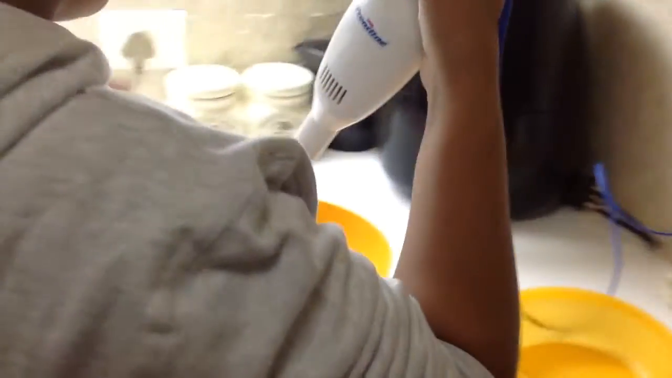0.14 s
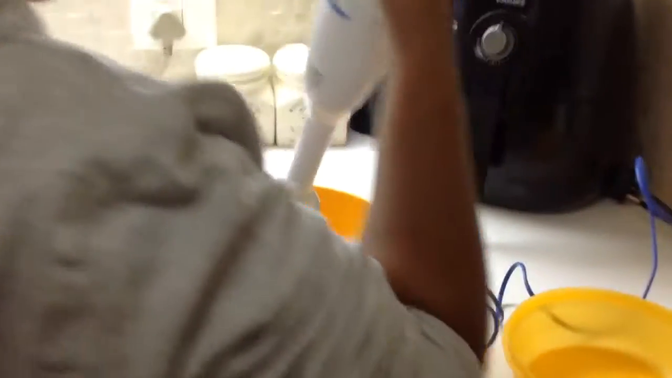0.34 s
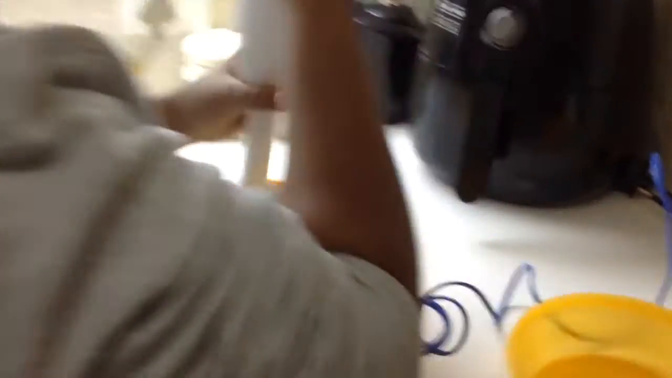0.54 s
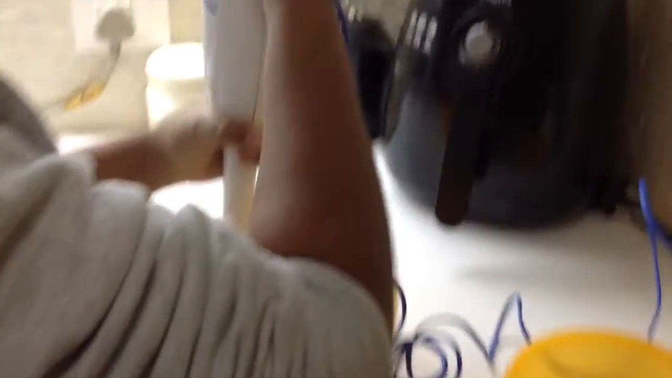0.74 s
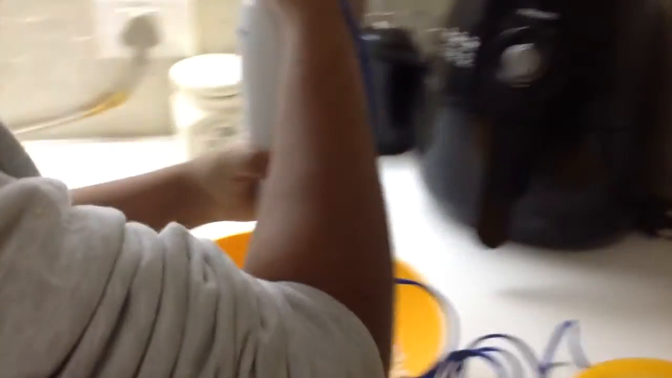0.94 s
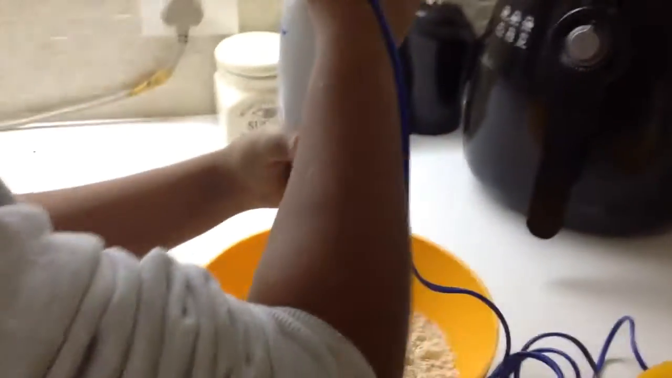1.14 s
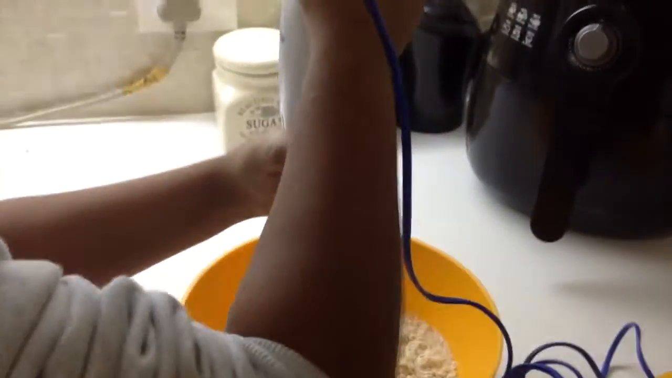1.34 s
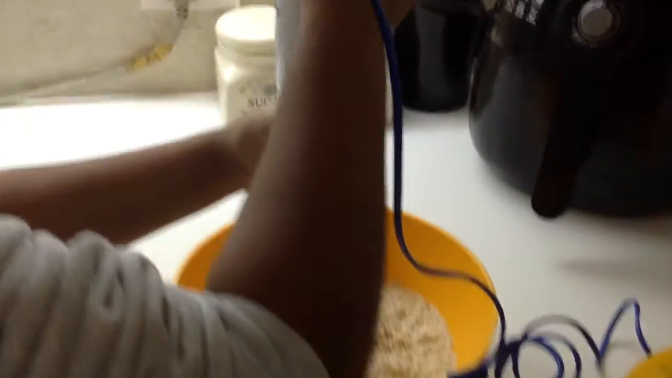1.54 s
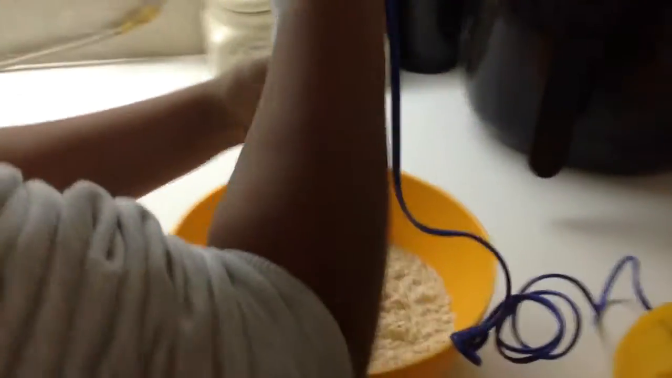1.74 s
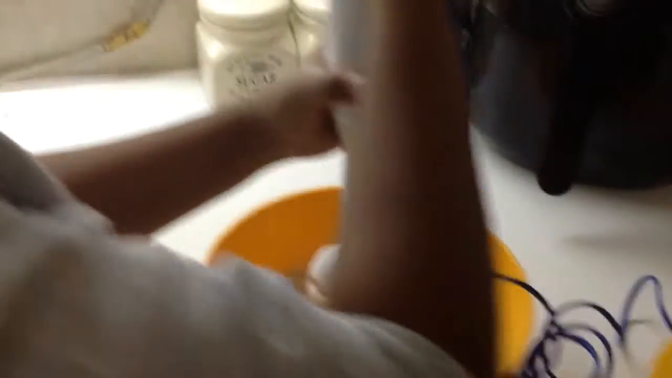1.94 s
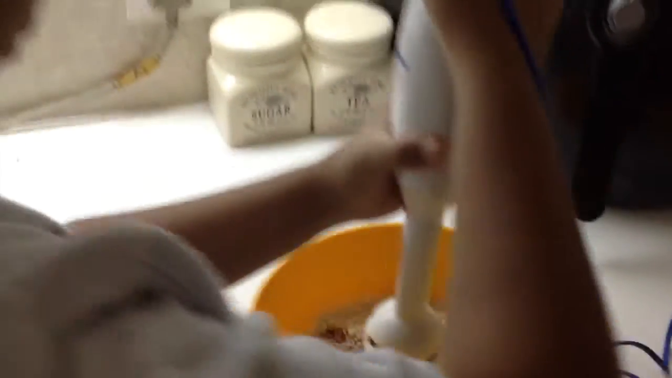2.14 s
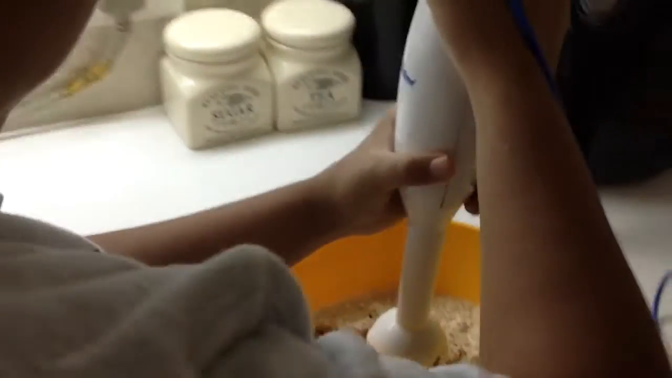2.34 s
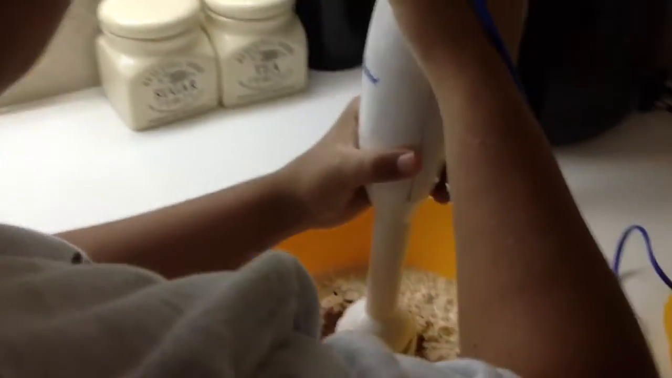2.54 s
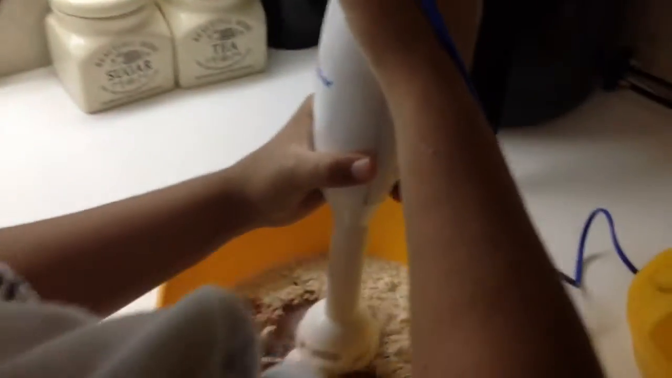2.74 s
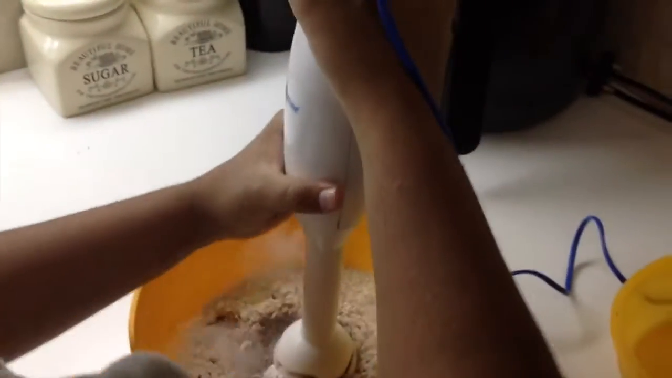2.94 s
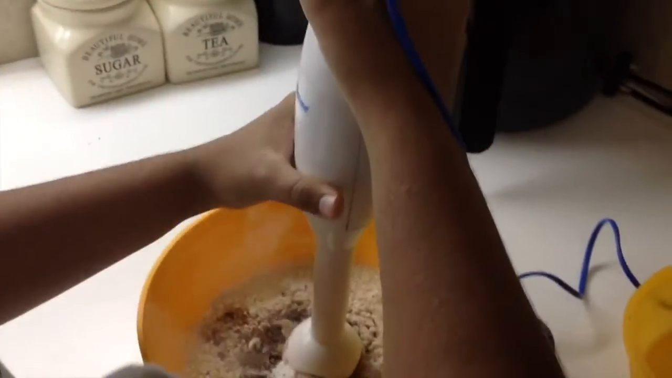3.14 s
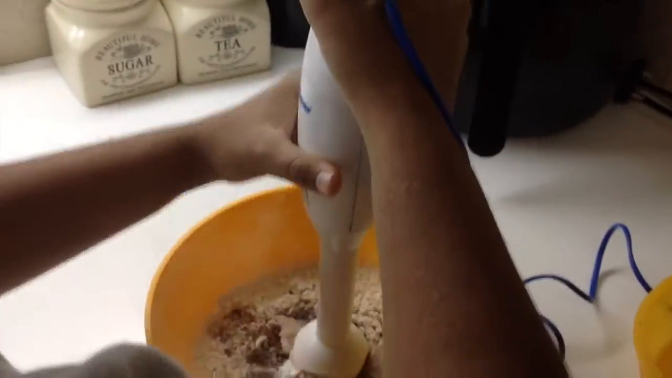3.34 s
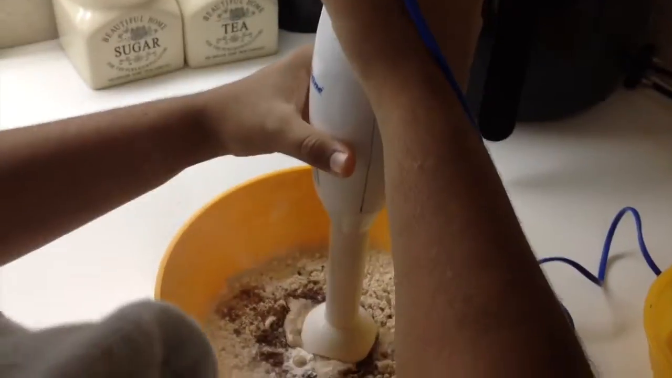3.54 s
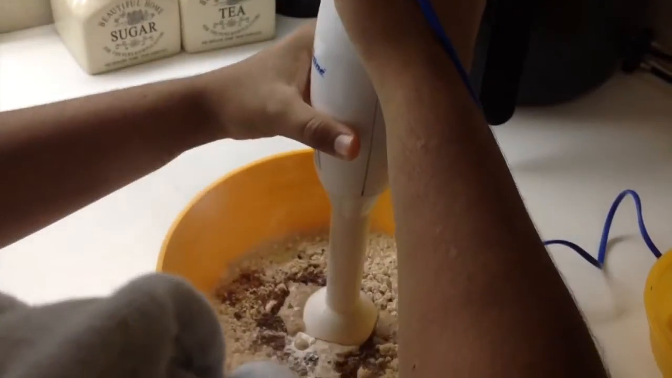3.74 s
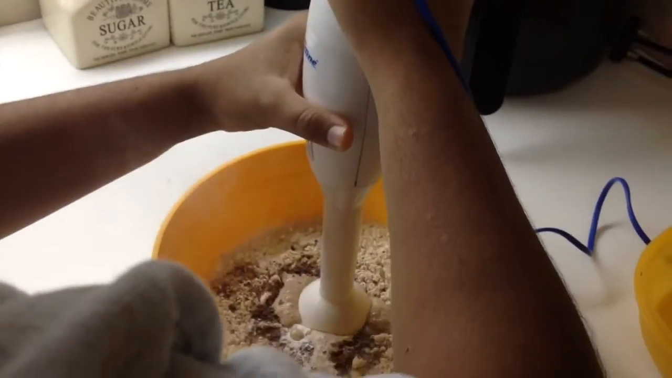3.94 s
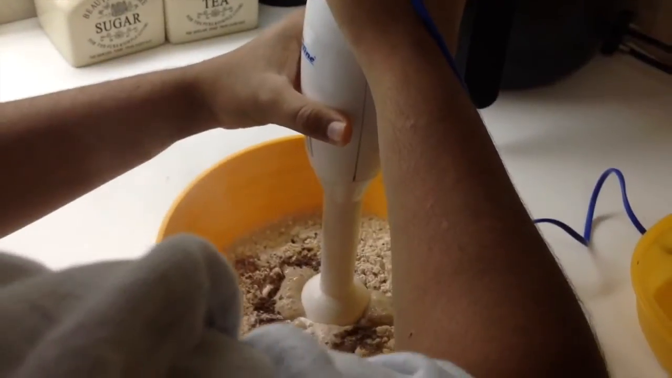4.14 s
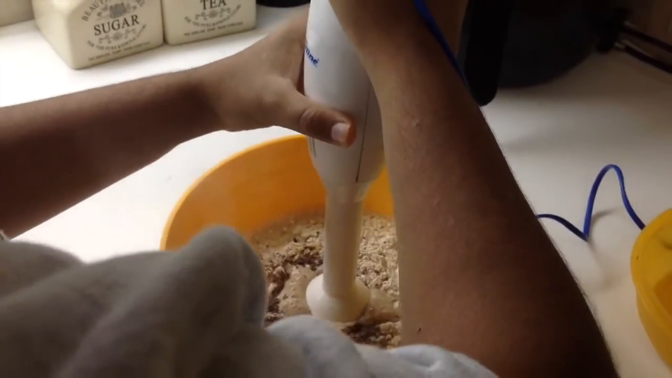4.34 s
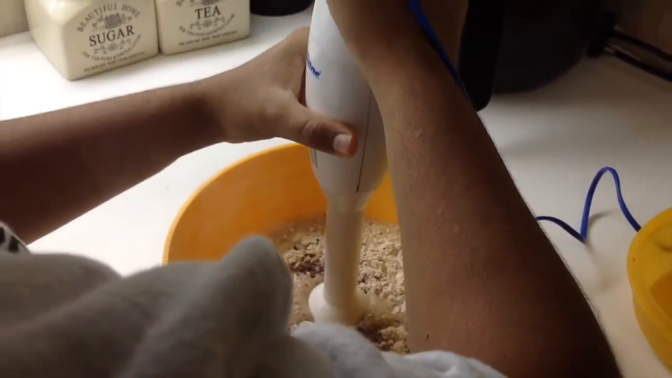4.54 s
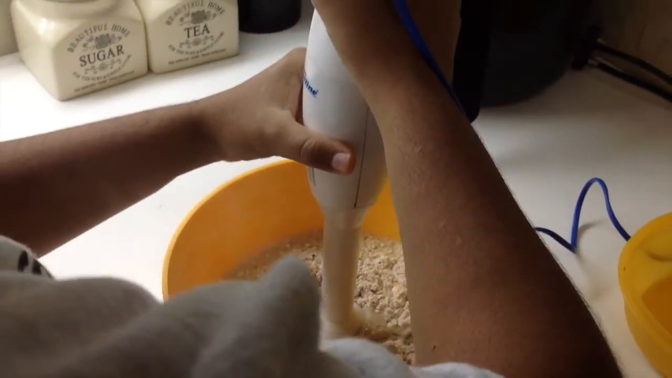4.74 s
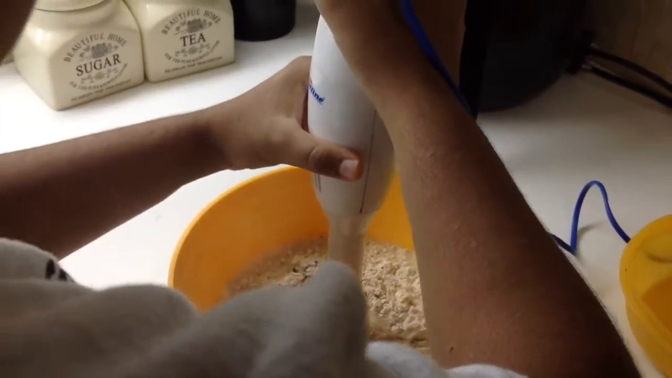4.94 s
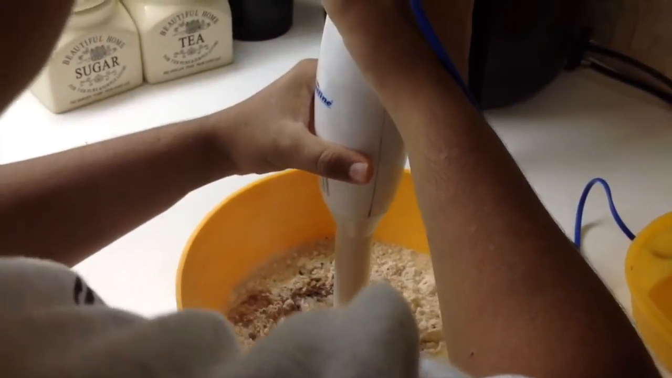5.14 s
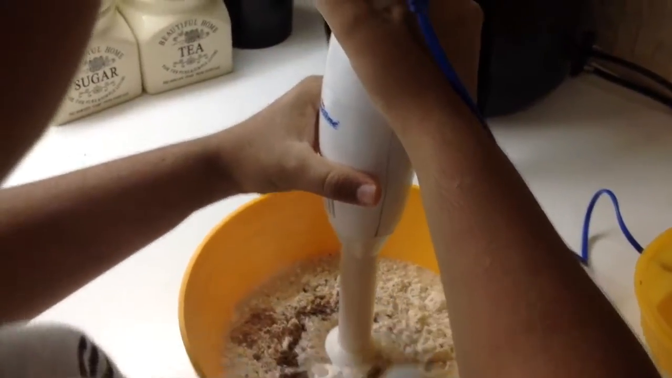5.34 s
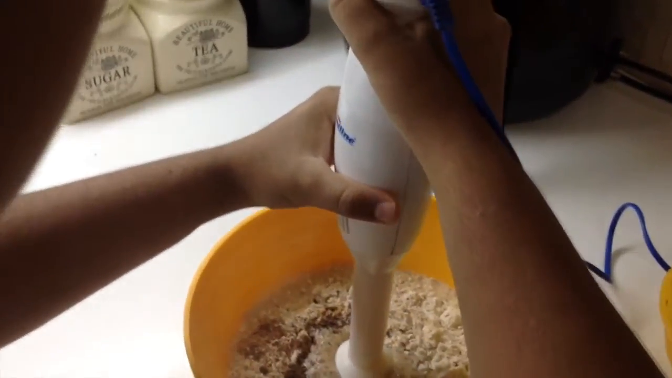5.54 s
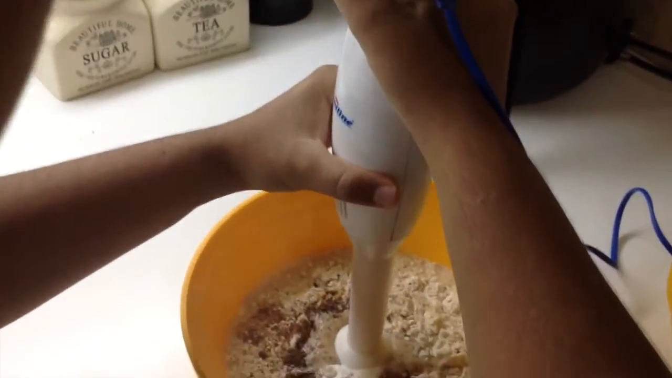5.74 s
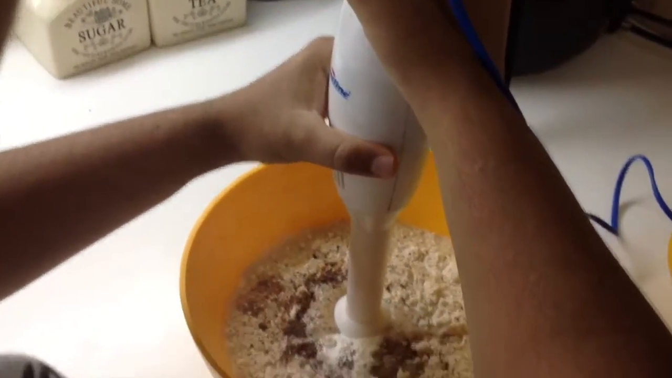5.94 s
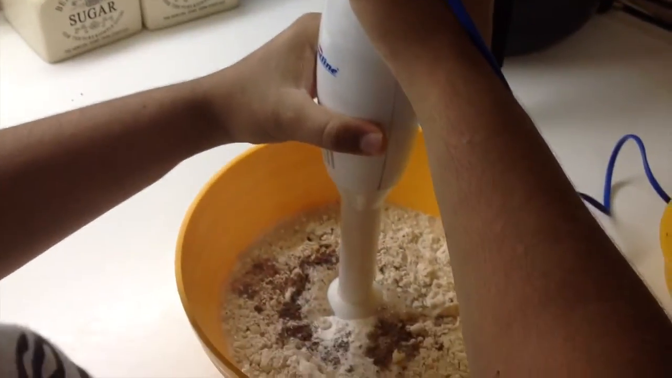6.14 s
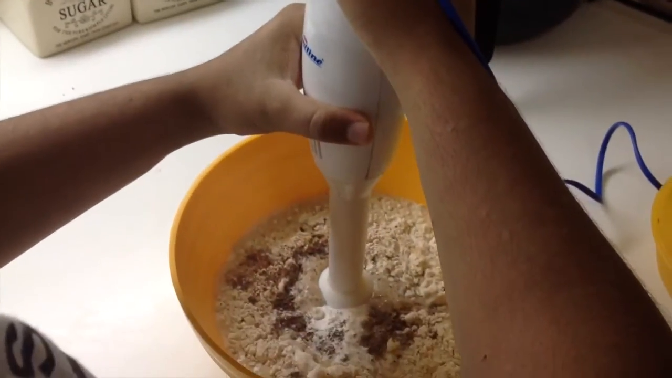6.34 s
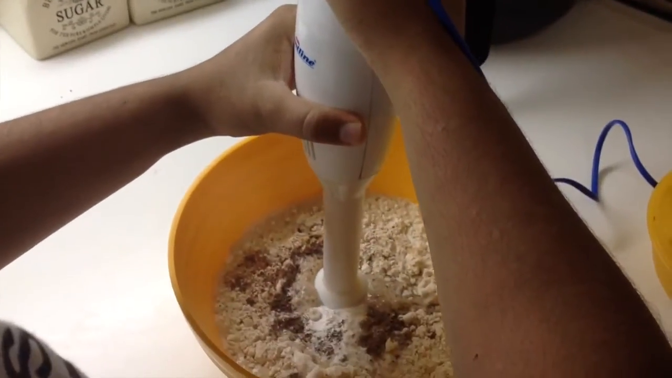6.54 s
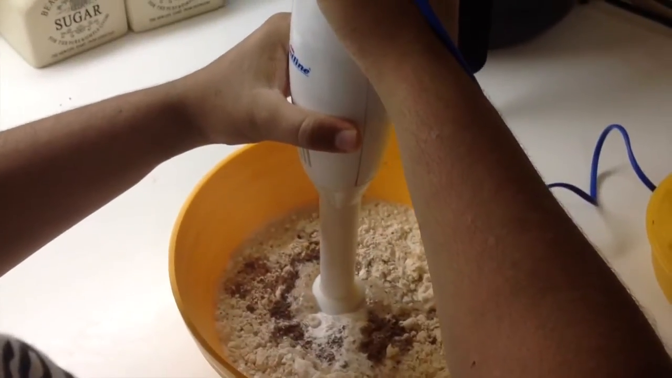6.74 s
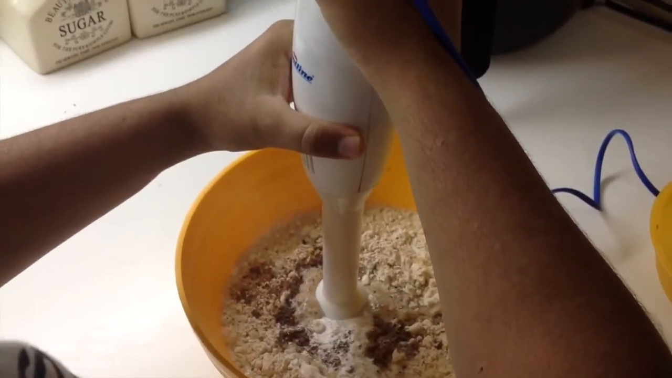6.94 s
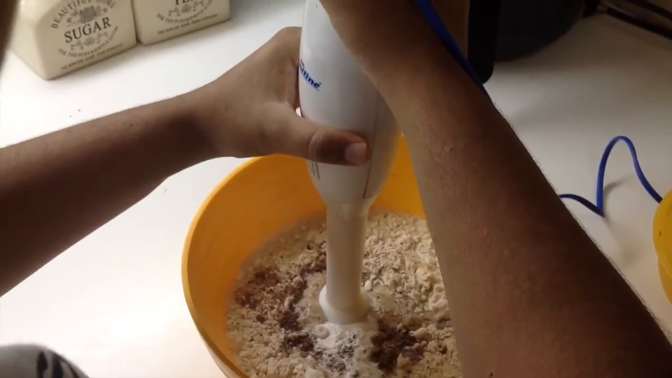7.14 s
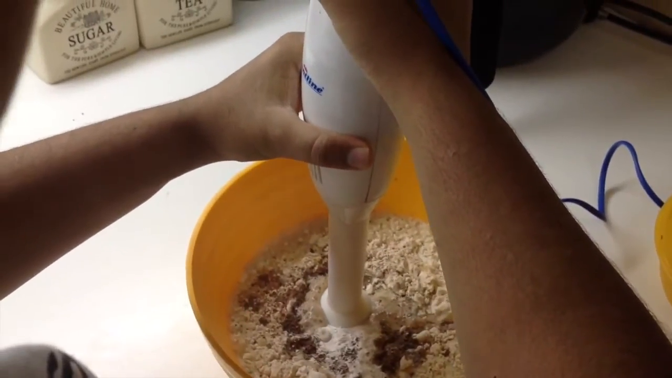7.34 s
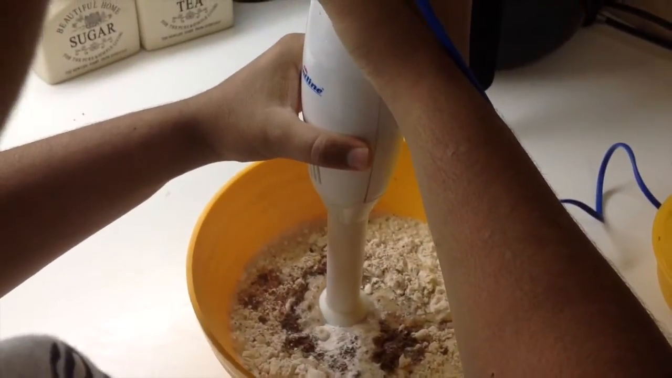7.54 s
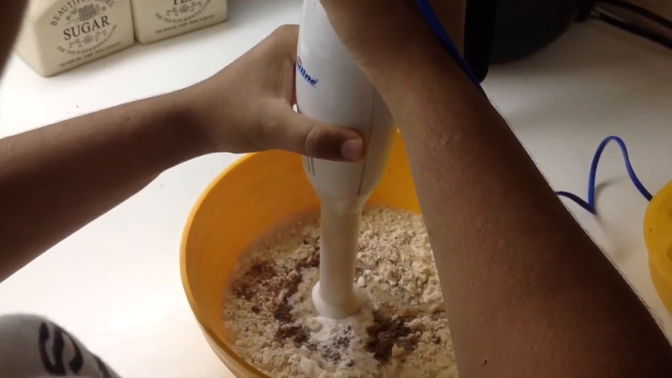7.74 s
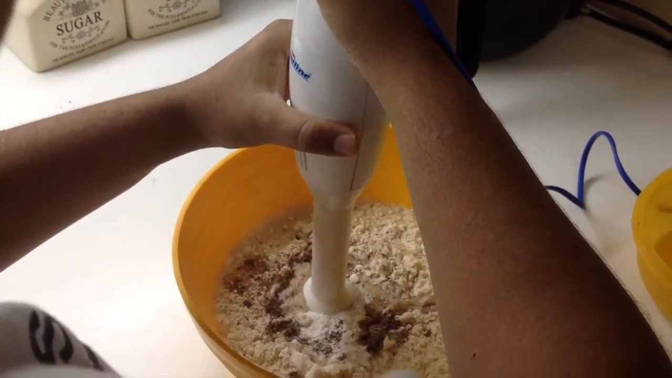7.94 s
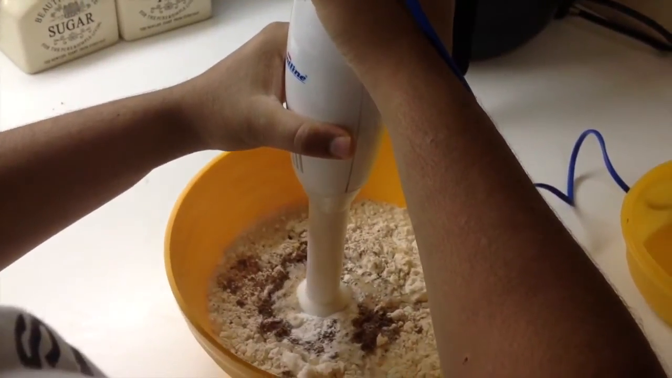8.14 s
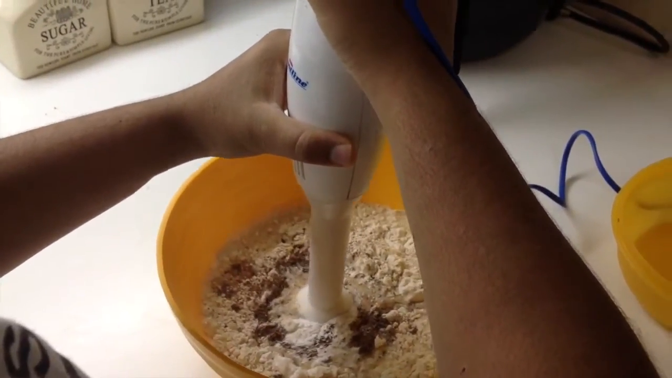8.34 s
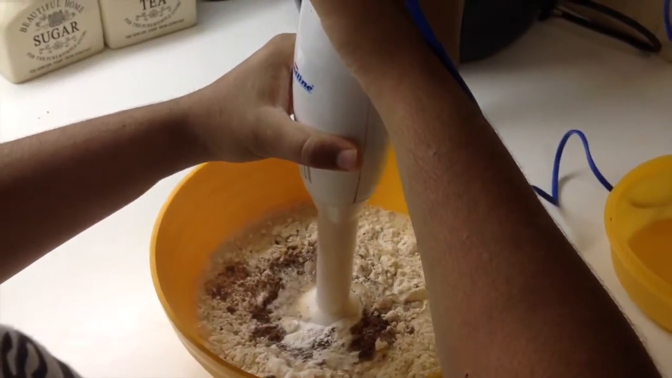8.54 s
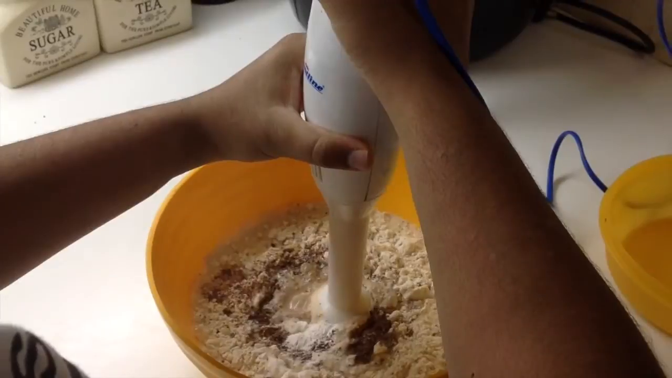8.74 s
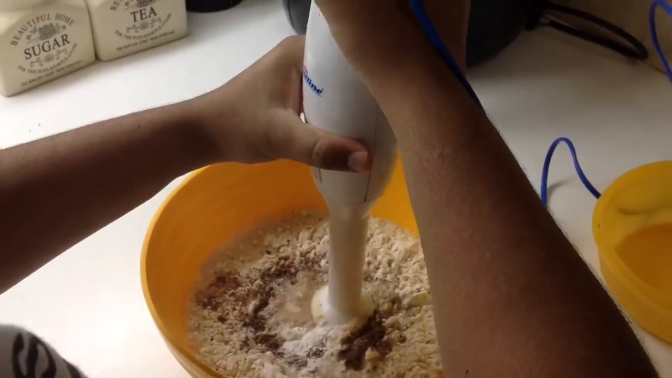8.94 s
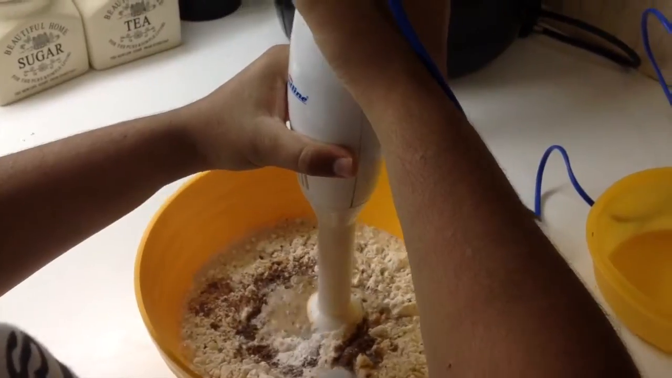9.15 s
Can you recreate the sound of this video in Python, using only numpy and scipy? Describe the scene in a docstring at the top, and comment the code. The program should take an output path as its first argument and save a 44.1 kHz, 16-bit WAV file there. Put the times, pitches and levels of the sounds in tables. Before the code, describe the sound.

In a quiet kitchen, handling clicks give way to a small electric blender motor running up to a harsh, buzzing, hissing whine that lasts to the end.

```python
"""A hand blender runs up in a quiet kitchen: sines at multiples of the shaft speed swell in turn, under
a blurred high whine, mains hum, squeals and rough bursts, and noise from churned batter, air and brushes.
Before it, air and rustle are shaped noise, thumps are damped sines and plastic clicks are noise bursts.
Late on, the blade guard bumps the bowl, a sum of decaying modes; the room answers clicks and bumps.
One microphone feeds two equal channels."""
import sys
import numpy as np
from scipy import signal
from scipy.fft import rfft, irfft, next_fast_len
from scipy.io import wavfile
from scipy.ndimage import uniform_filter1d, map_coordinates

SR = 44100
rng = np.random.default_rng(int(sys.argv[2]) if len(sys.argv) > 2 else 0)


def volts_from_db(level):
    """Convert decibel levels to linear amplitude ratios."""
    exponent = np.asarray(level, float) / 20
    return 10 ** exponent


def to_wav(s):
    """Save 16-bit WAV."""
    ch = np.atleast_2d(s).T  # columns
    pcm = np.round(np.clip(ch, -1, 1) * 32767)  # PCM
    wavfile.write(sys.argv[1], SR, pcm.astype(np.int16))


N = 410130  # samples
STEP = 64  # samples between control values

# still air of the kitchen: (frequency [Hz], relative level [dB])
AIR_COLOUR = [(15, -46), (25, -19), (33, -30), (48, -27), (139, 6), (364, -1), (440, -4.5), (1090, -4),
              (1180, -9), (1390, -8.5), (7730, -14), (15100, -26)]
# sleeves and cord rustle, mainly before the start: (time [s], level [dB])
RUSTLE = [(0, -68.5), (.4, -75.5), (.48, -70), (.5, -62), (.8, -68), (1.2, -68), (1.3, -75)]
# soft thumps on the counter: (time [s], level [dB], ring [Hz])
THUMPS = [(0.234, -52, 153), (0.285, -59, 190), (0.482, -46, 146), (0.529, -65, 361), (1.147, -48, 165),
          (1.262, -42, 183)]
# the blade guard bumps the bowl: (time [s], relative level [dB])
BUMPS = [(8.773, -14), (8.809, -22), (8.956, -24)]
# modes of the bowl: (frequency [Hz], mean relative level [dB], decay by 60 dB [s])
BOWL_MODES = [(280, -5, 0.13), (555, 11, 0.091), (730, 1, 0.087), (1110, 17, 0.055), (1430, 2, 0.059)]
# plastic clicks of latch, hands and switch: (time [s], relative level [dB], brightness [dB per octave])
CLICKS = [(0.46, -52, -1), (0.534, -19, -0.5), (0.796, -48, -3.5), (0.917, -38.5, -0.5), (1.061, -48, -4),
          (1.198, -48, -1.5), (1.253, -26.5, -1.3)]
# colour of the clicks before scaling: (frequency [Hz], level [dB])
CLICK_COLOUR = [(90, -40), (150, -14), (700, -11.5), (2000, -7.5), (3300, -5), (7000, -8), (11000, -13.5),
                (15100, -30)]
# reverberation of the kitchen: (frequency [Hz], decay by 60 dB [s])
KITCHEN_DECAY = [(200, 0.57), (2000, 0.55), (6000, 0.45), (14000, 0.25)]
# motor noise: (time [s], roar level [dB], relative depth of the blade in the batter [1], spray in the hiss [dB])
MOTOR = [(1.255, -58, 0, 0), (1.28, -53, 0.45, 1), (1.35, -42, 0.58, -1), (1.45, -38, 0.12, -0.5),
         (1.62, -32, -1.3, 0), (1.88, -31.5, -1.4, -1), (2.05, -32.5, -.4, 0), (2.3, -33.5, -0.085, -1),
         (2.65, -34, -0.043, -1), (2.95, -35, 0, 3), (3.2, -33.5, 0, 3), (3.35, -35, 0.34, 3.5),
         (3.5, -33.5, 0.13, 2.5), (3.65, -35.5, 0.055, 0.5), (4.1, -34.5, 0.29, 0.5),
         (4.5, -36, 0.77, -0.5), (4.9, -35.5, 0.62, -1), (5.3, -35.5, 0, 0.5), (5.7, -33, 0.41, 0),
         (6.3, -34.5, 0.34, 0), (7.0, -34, .3, 0), (7.7, -34, 0.16, 0), (8.4, -35, 0.26, 1),
         (8.7, -35.5, 0.05, 1.5), (8.95, -35, 0.36, 0), (9.3, -35, .2, -0.5)]
# batter round the blade: (frequency [Hz], relative level [dB])
CHURN_COLOUR = [(45, -70), (90, -53), (130, -39), (200, -19.5), (300, -20), (450, -14), (520, -9),
                (570, -10), (660, -1.5), (760, -7), (960, -12), (1100, -8), (1500, -8.5), (1750, -5.5),
                (2000, -16), (2600, -31)]
# low boom, a resonance passed twice: (frequency [Hz], width [Hz], level per pass [dB])
BOOM = [(366, 42, 0)]
# drone of bowl and housing, resonances passed twice: (frequency [Hz], width [Hz], level per pass [dB])
HOUSING = [(1280, 99, 1), (1434, 220, -4.5)]
# raspy middle band: (frequency [Hz], relative level [dB])
RASP_COLOUR = [(1120, -28.5), (1900, -5.5), (2110, 0.5), (2290, -7), (2740, -0.5), (3960, -0.5), (4300, -6),
               (5590, -47), (9460, -120)]
# hiss of air and brushes: (frequency [Hz], relative level [dB])
HISS_COLOUR = [(2350, -34), (4000, -9), (4520, 3), (5550, -2), (6040, -2), (6340, -3), (10800, -6),
               (14400, -10.5), (15100, -13.5)]
# vent resonances laid over the hiss: (frequency [Hz], width [Hz], level [dB])
VENTS = [(6250, 230, -7), (7720, 120, -1.5), (9100, 230, -2), (10500, 190, 1), (13000, 300, -7)]
# swells at twice the mains: (start [s], end [s], level at start [dB], level at end [dB])
TWICE_MAINS = [(1.26, 2.2, -74, -76), (3.1, 4.9, -76, -76), (4.95, 5.62, -73, -68)]
# swells at three times the mains: (start [s], end [s], level at start [dB], level at end [dB])
THRICE_MAINS = [(1.5, 2.1, -70, -72), (3.85, 5.6, -73, -72), (5.85, 7.55, -71.5, -69.5),
                (7.7, 8.25, -63, -59), (8.8, 9.3, -68, -70)]
# swells of the counter rumble: (start [s], end [s], level at start [dB], level at end [dB])
RUMBLE = [(4.25, 4.8, -67, -71)]
# squeals of dry rubbing, with a few wide rough bursts and rattles as the bowl is bumped:
# (start [s], end [s], frequency [Hz], blur before scaling [Hz], level [dB])
SQUEALS = [(1.33, 1.5, 1310, 25, -42), (1.53, 1.6, 1296, 25, -35), (1.43, 1.58, 2090, 130, -42),
           (1.56, 1.7, 3410, 55, -35), (1.76, 1.96, 3365, 60, -28), (2.06, 2.28, 3518, 60, -35),
           (2.36, 2.95, 3590, 75, -43), (1.56, 1.72, 2985, 65, -33), (1.8, 1.98, 2915, 75, -34),
           (2.08, 2.82, 3028, 55, -44), (3.32, 3.5, 1120, 85, -34), (3.5, 3.58, 720, 150, -40),
           (3.2, 4.6, 3335, 80, -47), (5.5, 6.65, 3245, 70, -48), (6.82, 7.62, 3600, 105, -41),
           (7.72, 7.95, 3540, 110, -42), (8.03, 8.42, 3500, 95, -39), (8.7, 9.3, 3620, 110, -50),
           (2.42, 2.72, 4635, 75, -46), (3.2, 3.55, 4830, 70, -45), (3.68, 4.3, 4655, 71, -45),
           (4.42, 4.92, 4770, 105, -46), (5.05, 6.6, 4592, 85, -43), (6.72, 8.5, 4525, 85, -46),
           (4.9, 5.5, 2715, 80, -48), (2.55, 4.6, 4430, 85, -49), (7.4, 8.45, 4828, 75, -48),
           (8.78, 8.83, 700, 170, -36), (8.94, 8.98, 900, 200, -41)]
# shaft speed in run-up, sag under load, recovery and a stumble on the bowl: (time [s], turns [Hz])
SHAFT_SPEED = [(1.3, 117.5), (1.34, 127.2), (1.43, 184.8), (1.54, 214.3), (1.63, 229.3), (1.77, 243.6),
               (1.94, 252.8), (2.12, 261.7), (2.39, 268.1), (2.86, 276.4), (3.05, 278), (3.15, 272),
               (3.42, 275.7), (4.05, 275.4), (4.33, 259.9), (4.62, 260.7), (4.88, 267.5), (5.09, 280.4),
               (5.47, 295.3), (6.49, 292.1), (7.54, 297), (8.3, 300.5), (8.68, 296.1), (8.83, 269),
               (8.96, 284.6), (9.08, 277.3), (9.19, 288), (9.3, 279)]
# resting gain of shaft orders 1 to 11: level [dB]
ORDER_REST = [-65.5, -61, -68, -60.5, -54.5, -60, -61, -54.5, -54, -67, -62]
# an order sings out while grip and load suit it:
# (start [s], end [s], order [1], level at start [dB], level at end [dB])
SINGING_ORDERS = [(1.63, 3.5, 1, -62, -68), (3.6, 4.2, 1, -66, -59), (4.45, 4.85, 1, -62, -59),
                  (8.78, 8.9, 1, -49, -61), (1.42, 1.47, 2, -47, -46), (1.75, 1.96, 2, -46, -55),
                  (2.05, 3.603, 2, -38.5, -37), (3.698, 4.895, 2, -41.5, -44), (5.35, 6.98, 2, -50, -48),
                  (4.966, 5.22, 2, -36.5, -38), (7.045, 8.657, 2, -41.5, -38.5), (8.765, 9.12, 2, -42, -42),
                  (1.75, 2.01, 3, -39.5, -42), (2.1, 2.45, 3, -33.5, -33.5), (2.55, 3.48, 3, -40, -52),
                  (3.5, 4.5, 3, -55, -67), (7.4, 8.9, 3, -60, -51.5), (1.42, 1.45, 4, -40, -37.5),
                  (1.55, 1.64, 4, -41, -32), (1.74, 1.83, 4, -35, -39), (1.903, 3.28, 4, -45, -41.5),
                  (3.34, 3.44, 4, -31.5, -27), (3.51, 5.35, 4, -37, -44), (5.42, 6.88, 4, -34, -32),
                  (6.969, 7.701, 4, -30.5, -30), (7.804, 8.7, 4, -34, -44.5), (8.86, 9.0, 4, -45, -47),
                  (2.2, 2.425, 5, -49, -28.5), (2.5, 2.62, 5, -30.5, -34.5), (2.736, 4.05, 5, -41, -39.5),
                  (4.13, 4.85, 5, -30.5, -25), (4.907, 5.26, 5, -39.5, -48), (8.743, 8.79, 5, -40, -31.5),
                  (8.9, 9.1, 5, -39, -41), (1.9, 2.948, 6, -38.5, -36), (3.075, 3.2, 6, -34.5, -35),
                  (3.4, 4.05, 6, -44, -49), (5.446, 6.853, 6, -41, -47), (6.92, 8.68, 6, -37.5, -38),
                  (8.8, 8.92, 6, -42, -43), (9.04, 9.1, 6, -39, -40), (1.76, 1.94, 7, -46, -52),
                  (2.38, 3.22, 7, -46, -42), (4.286, 4.68, 7, -52, -47), (1.71, 2.0, 8, -42, -41),
                  (3.02, 4.15, 8, -48.5, -53), (5.38, 7.2, 9, -51, -57), (7.4, 8.665, 9, -44, -51),
                  (2.48, 4.15, 10, -46, -45), (7.42, 8.66, 10, -49, -50), (5.4, 7.14, 11, -47, -54)]
# the high whine sings out: (start [s], end [s], level at start [dB], level at end [dB])
WHINE = [(1.85, 2.05, -44, -52), (2.6, 3.6, -50, -50), (4.2, 4.9, -53, -57), (5.36, 8.66, -47.5, -50),
         (8.92, 9.1, -51, -50)]
# its octave sings out: (start [s], end [s], level at start [dB], level at end [dB])
WHINE_OCTAVE = [(1.5, 1.85, -54, -50), (4.3, 4.9, -57, -60)]

MAINS_HZ = 50
WHINE_ORDER = 19.9  # whine frequency over shaft speed
RISE_S, FALL_S = 0.05, 0.08  # edges of every passage


def unit(x):
    """Normalisation by mean power: the result has rms 1."""
    return x / np.sqrt(np.mean(x ** 2) + 1e-20)


def along(points, hz):
    """Spectral interpolation: (frequency, value) points joined on a logarithmic frequency axis."""
    f, v = np.transpose(points)
    return np.interp(np.log(hz + 1), np.log(f + 1), v)


def curves(rows):
    """Linear interpolation in time: one value per sample for each column after the time."""
    s, *columns = np.transpose(rows)
    return [np.interp(np.arange(N) / SR, s, column) for column in columns]


def wobble(rate, size=N):
    """Band-limited random variation: a smooth curve through rate random knots a second."""
    at = np.arange(0, size + STEP, STEP)
    knots = map_coordinates(rng.standard_normal(int(size * rate / SR) + 4), [at * rate / SR])
    return np.interp(np.arange(size), at, knots)


def filtered(x, response):
    """Linear filtering: the spectrum of x times a response of frequency."""
    m = next_fast_len(N + SR // 2)
    return irfft(rfft(x, m) * response(np.fft.rfftfreq(m, 1 / SR)), m)[..., :N]


def resonances(peaks, f):
    """Modal superposition: damped second-order resonators summed with alternating sign."""
    return sum((-1) ** k * volts_from_db(db) * 1j * f * width / (centre ** 2 - f ** 2 + 1j * f * width)
               for k, (centre, width, db) in enumerate(peaks))


def rush(response, patchy_db):
    """Turbulence as coloured noise of rms 1, with random gain over patches of time and frequency."""
    z = signal.stft(rng.standard_normal(N), nperseg=512)[2]
    field = uniform_filter1d(rng.standard_normal(z.shape), size=4, axis=0)
    field = uniform_filter1d(field, size=16, axis=1)
    noise = signal.istft(z * volts_from_db(patchy_db * unit(field)), nperseg=512)[1][:N]
    return unit(filtered(noise, response))


def passages(rows, rest_db=-120):
    """Superposed envelopes: each row adds a rise, a drift between two levels and a fall to a resting gain."""
    t = np.arange(0, N + STEP, STEP) / SR
    gain = volts_from_db(rest_db)
    for s, end, db, end_db in rows:
        gain = gain + np.interp(t, [s - RISE_S, s, end, end + FALL_S], [0, volts_from_db(db), volts_from_db(end_db), 0])
    return np.interp(np.arange(N) / SR, t, gain)


def blurred(hz, blur_hz, steady=0.):
    """Random modulation: a tone of rms 1, part steady, part wandering in size and phase at about blur_hz."""
    knots = np.cumsum(blur_hz) / SR
    re, im = (map_coordinates(rng.standard_normal(int(knots[-1]) + 4), [knots]) for _ in range(2))
    carrier = np.exp(2j * np.pi * np.cumsum(hz) / SR)
    return unit(np.real((re + 1j * im + steady) * carrier))


def room_air():
    """Stationary background noise: a quiet coloured rush with a slowly wandering level."""
    level = volts_from_db(-69.5 + 1.7 * wobble(10))
    return level * rush(lambda f: volts_from_db(along(AIR_COLOUR, f)), patchy_db=2.0)


def rustle():
    """Friction noise: sleeves and cord give a broad resonance of noise with an uneven level."""
    level = volts_from_db(curves(RUSTLE)[0] + 2.0 * wobble(16.3))
    return level * rush(lambda f: resonances([(3500, 8200, 0)], f), patchy_db=1.0)


def thumps():
    """Damped oscillation: each blow gives a low swing with a shorter knock at 3.2 times its frequency."""
    out, t = np.zeros(N + SR), np.arange(SR // 4) / SR
    for s, db, hz in THUMPS:
        swing = volts_from_db(-60 * t / 0.055) * np.sin(2 * np.pi * hz * t)
        knock = 0.65 * volts_from_db(-60 * t / 0.013) * np.sin(6.4 * np.pi * hz * t)
        out[round(s * SR):][:len(t)] += volts_from_db(db) * (swing + knock)
    return out[:N]


def clicks():
    """Impulsive excitation: a sharp tick, then a dry clatter of plastic; the room answers the tick."""
    out, ticks, t = np.zeros(N + SR), np.zeros(N), np.arange(SR // 8) / SR
    hz = np.fft.rfftfreq(len(t), 1 / SR)
    for s, db, tilt_db in CLICKS:
        tick = 0.66 * volts_from_db(-60 * t / 0.0056)
        clatter = (1 - np.exp(-t / 0.0023)) * volts_from_db(-60 * t / 0.05)
        colour = volts_from_db(tilt_db * np.log2((hz + 100) / 4000))
        noise = unit(irfft(rfft(rng.standard_normal(len(t))) * colour, len(t)))
        out[round(s * SR):][:len(t)] += volts_from_db(db - 6) * (tick + clatter) * noise
        ticks[round(s * SR)] = volts_from_db(db + 7)
    return filtered(out[:N] + kitchen(ticks), lambda f: volts_from_db(0.84 * along(CLICK_COLOUR, f) + 6.5))


def kitchen(x):
    """Reverberation: convolution with noise in which each frequency decays at its own rate."""
    hz, t, z = signal.stft(rng.standard_normal(SR // 2), SR, nperseg=256)
    decay = volts_from_db(-60 * t / along(KITCHEN_DECAY, hz)[:, None])
    tail = signal.istft(z * decay, SR, nperseg=256)[1]
    delayed = np.pad(x, (200, 0))  # samples
    return signal.fftconvolve(delayed, tail / np.linalg.norm(tail))[:N]


def running():
    """Switching transient: the gain ramps from 0 to 1 in 11 ms as the switch closes."""
    return np.clip((np.arange(N) / SR - MOTOR[0][0]) / 0.011, 0, 1)


def noises():
    """Flow noise: batter sloshes, bowl and housing drone, air and brushes hiss; depth favours the low layers."""
    roar_db, depth, spray_db = curves(MOTOR)
    churn = rush(lambda f: volts_from_db(along(CHURN_COLOUR, f)), patchy_db=1.5)
    boom = rush(lambda f: resonances(BOOM, f) ** 2, patchy_db=0.5)
    drone = rush(lambda f: resonances(HOUSING, f) ** 2, patchy_db=2.0)
    rasp = rush(lambda f: volts_from_db(along(RASP_COLOUR, f)), patchy_db=1.0)
    hiss = rush(lambda f: volts_from_db(along(HISS_COLOUR, f)) * (1.8 + abs(resonances(VENTS, f))), patchy_db=1.5)

    def share(db, depth_db, wander_db):
        """Loading: gain against the roar, changed by depth_db per unit of depth and its own slow wander."""
        return volts_from_db(db + depth_db * depth + wander_db * wobble(6))

    layers = share(-3.5, 3.1, 0.96) * churn
    layers += share(-22.5, 9, 2.2) * boom
    layers += share(-3.5, 4.6, 0.8) * drone
    layers += share(-2.36, -1.3, 0.82) * rasp
    layers += volts_from_db(spray_db) * hiss
    return volts_from_db(roar_db + 0.25 * wobble(14)) * layers


def hum():
    """Magnetic forces: the field winding buzzes at mains multiples; the counter rumbles under the pressed bowl."""
    phase = 2 * np.pi * MAINS_HZ * np.arange(N) / SR + 0.39 * wobble(6)
    twice = passages(TWICE_MAINS, rest_db=-79.5) * np.sin(2 * phase)
    thrice = passages(THRICE_MAINS, rest_db=-73) * volts_from_db(1.5 * wobble(3)) * np.sin(3 * phase)
    rumble = rush(lambda f: resonances([(80, 30, 0)], f) ** 2, patchy_db=1)
    return twice + thrice + passages(RUMBLE, rest_db=-87) * rumble


def squeals():
    """Friction: dry rubbing squeals with a fast tremble; narrow rows are steadier, wide ones rough or rattling."""
    out = np.zeros(N)
    for s, end, hz, blur_hz, db in SQUEALS:
        gain = passages([(s, end, db, db)])
        on = slice(round((s - RISE_S) * SR), min(round((end + FALL_S) * SR), N))
        n = on.stop - on.start
        pitch_hz = hz + 0.5 * blur_hz * wobble(110, size=n)
        tone = blurred(pitch_hz, np.full(n, 1.8 * blur_hz), steady=(75 / blur_hz) ** 2)
        out[on] += gain[on] * volts_from_db(1.5 * wobble(6.3, size=n)) * tone
    return out


def shaft_orders(turns_hz):
    """Periodic forcing: unbalance and winding forces repeat each turn and give fluttering harmonics."""
    # extra flutter shrinks as the speed rises and is gone at 265 turns a second
    flutter = 0.044 + 0.78 * np.clip(1 - turns_hz / 265, 0, 1)
    angle = 2 * np.pi * np.cumsum(turns_hz) / SR + 0.06 * wobble(30) + flutter * wobble(120)
    lines = np.zeros(N)
    for k, rest_db in enumerate(ORDER_REST, start=1):
        rows = [(s, end, db, end_db) for s, end, order, db, end_db in SINGING_ORDERS if round(order) == k]
        gain = passages(rows, rest_db) * volts_from_db(0.97 * wobble(7) + 1.2 * wobble(25))
        lines += gain * np.sin(k * angle + 0.5 * wobble(12) + 6 * rng.random())
    return np.sqrt(2) * lines


def high_whine(turns_hz):
    """Amplitude modulation: a whine near order 20, perhaps from the bearing, has a line 50 Hz to each side."""
    swing = np.sqrt(2) * np.cos(2 * np.pi * MAINS_HZ * np.arange(N) / SR) + 0.8
    whine = blurred(WHINE_ORDER * turns_hz, np.full(N, 45.), steady=3.1)
    octave = blurred(2 * WHINE_ORDER * turns_hz, np.full(N, 450.))
    return passages(WHINE, rest_db=-59) * swing * whine + passages(WHINE_OCTAVE, rest_db=-52) * octave


def shaft_tones():
    """Rotation as source: orders and whine follow one speed and fade in from 140 to 185 turns a second."""
    turns_hz, = curves(SHAFT_SPEED)
    spun_up = np.clip((turns_hz - 140) / 45, 0, 1)
    return spun_up * (shaft_orders(turns_hz) + high_whine(turns_hz))


def bowl_bumps():
    """Modal excitation: each bump shakes all modes of the bowl, with random balance and a soft onset."""
    out, t = np.zeros(N + SR), np.arange(SR // 4) / SR
    for s, db in BUMPS:
        ring = sum(volts_from_db(level + rng.normal(0, 3.0) - 60 * t / t60) * np.sin(2 * np.pi * hz * t)
                   for hz, level, t60 in BOWL_MODES)
        out[round(s * SR):][:len(t)] += volts_from_db(db - 15) * ring * (1 - np.exp(-t / 0.0069))
    return out[:N]


def scene():
    """Superposition: blender, handling and room air add in two equal channels."""
    background = room_air() + rustle()
    knocks = thumps() + bowl_bumps()
    handling = knocks + volts_from_db(-5.5) * kitchen(knocks) + clicks()
    blender = running() * (noises() + hum() + squeals() + shaft_tones())
    return np.tile(background + handling + blender, (2, 1))


def roll_off(x):
    """The treble ends steeply here."""
    return signal.sosfilt(signal.butter(12, 15250, fs=SR, output="sos"), x)


def record(dry):
    """High-pass filtering: the microphone has a steep third-order bass cut."""
    def bass_cut(f, corner_hz=70):
        """Cascading: three equal first-order sections."""
        return (1j * f / (corner_hz + 1j * f)) ** 3

    return roll_off(filtered(dry, bass_cut))


dry = scene()
out = record(dry)
to_wav(out)
```